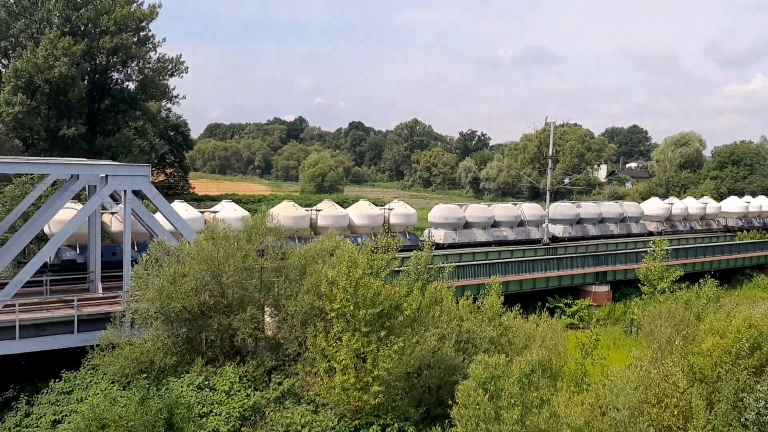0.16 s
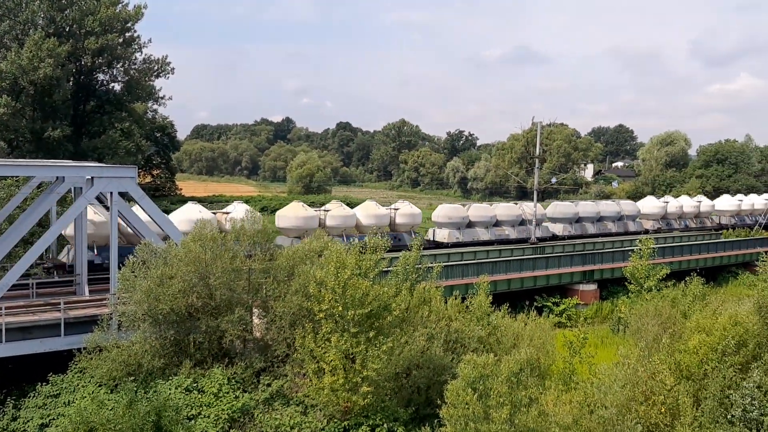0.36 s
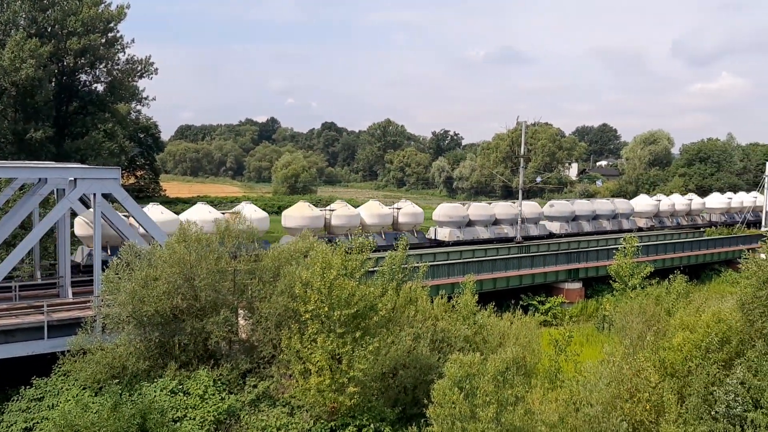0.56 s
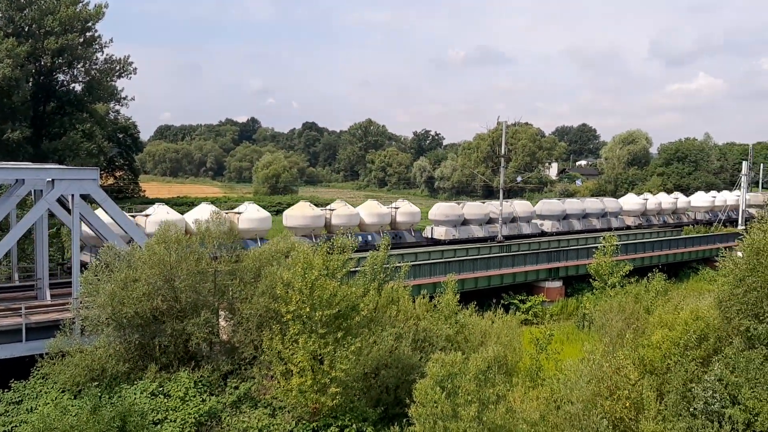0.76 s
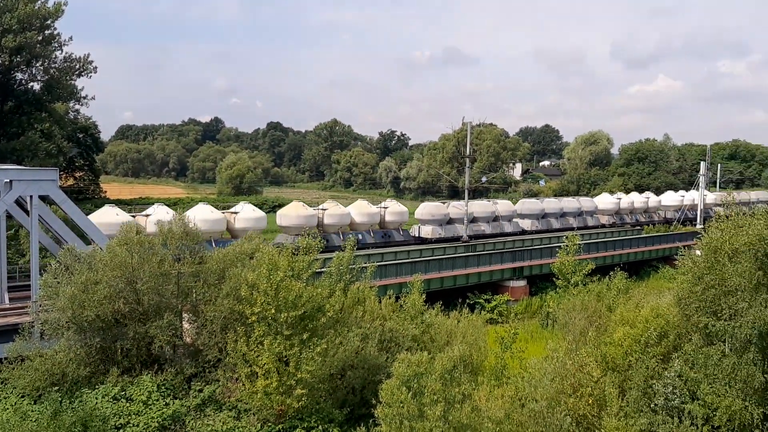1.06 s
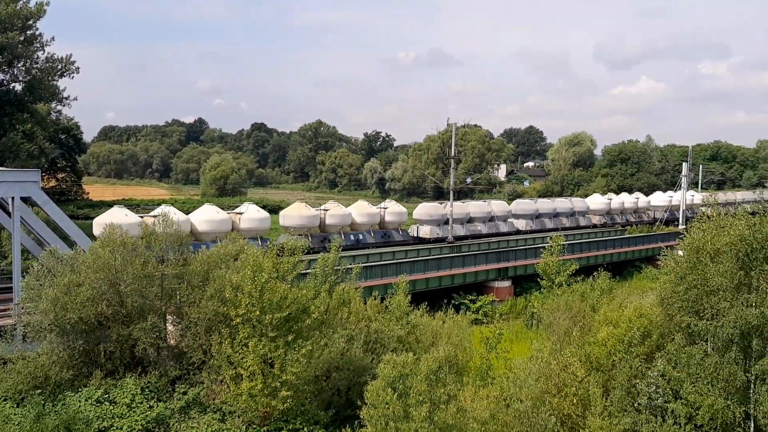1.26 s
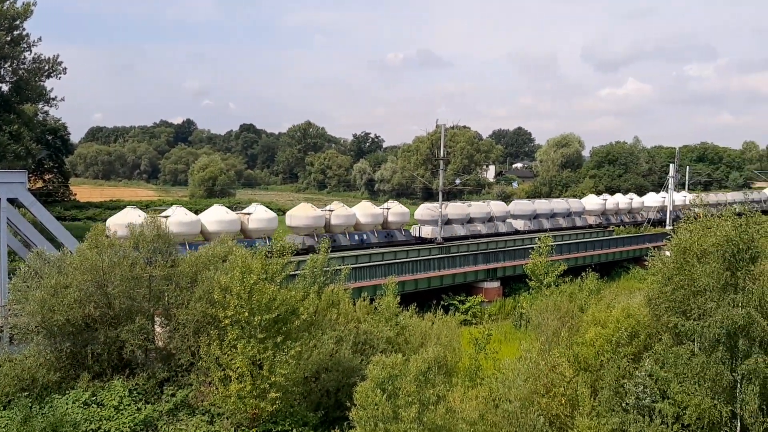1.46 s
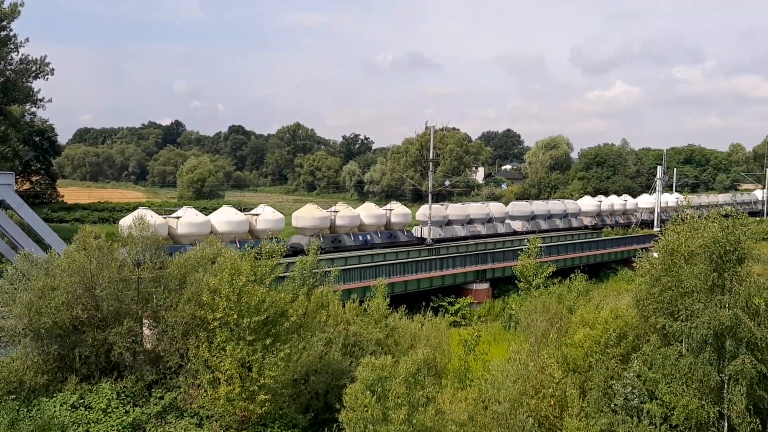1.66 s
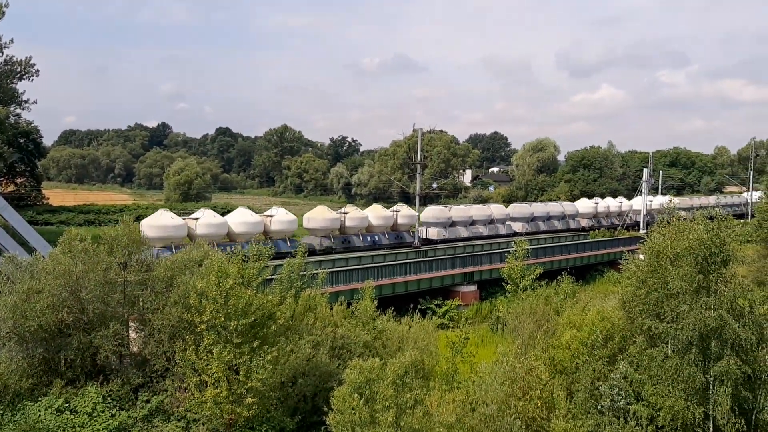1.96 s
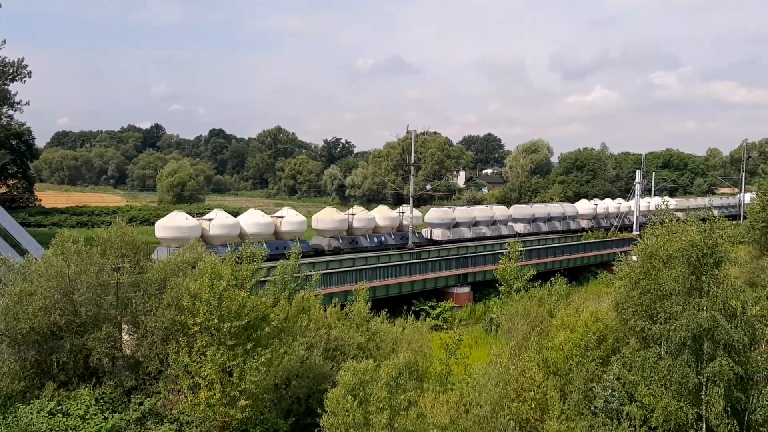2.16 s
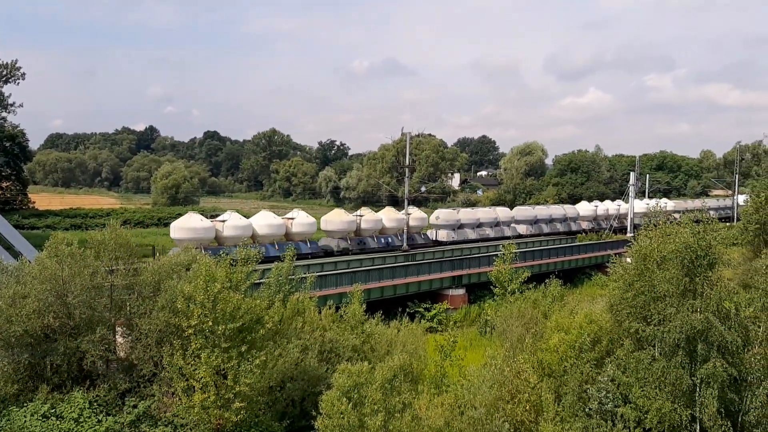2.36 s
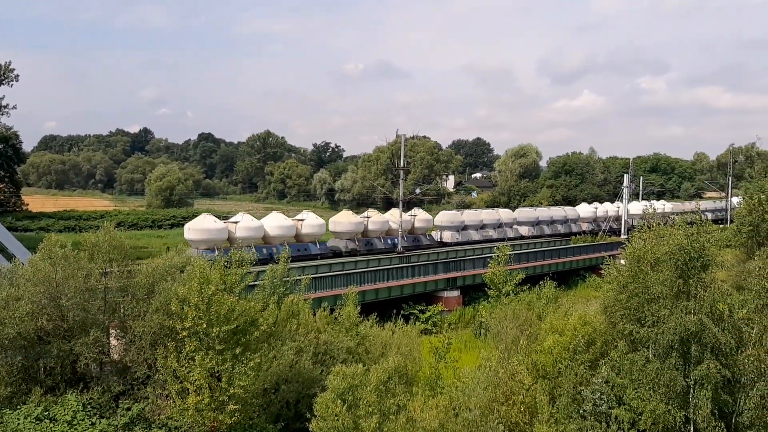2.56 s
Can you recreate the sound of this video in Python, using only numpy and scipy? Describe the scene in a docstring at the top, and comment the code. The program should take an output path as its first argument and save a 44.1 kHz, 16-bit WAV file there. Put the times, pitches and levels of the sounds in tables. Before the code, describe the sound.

Freight train wheels screech high and shrill, with rumbling, thumping steel bridge sounds dying away beneath.

```python
"""A freight train leaves a steel bridge, outdoors, off to the right of two microphone ports.
At first axles thump, the span booms and one wheel squeals, over rumble, clatter, rolling noise and flange hiss.
From about 0.9 s a second, slightly higher wheel joins, then a faint third, as rumble and clatter fade.
Each squeal is a fluttering tone, the two strong ones in a halo of scattered sound; brief squeaks come and go.
The rumbles and hisses are coloured noise, the thumps short bursts of scattered tone."""
import sys
import numpy as np
from scipy import signal
from scipy.fft import rfft, irfft, next_fast_len
from scipy.io import wavfile
from scipy.ndimage import uniform_filter1d, minimum_filter1d, map_coordinates

SR = 44100
rng = np.random.default_rng(int(sys.argv[2]) if len(sys.argv) > 2 else 0)


def put_to_file(sound):
    """Save the sound as 16-bit audio at rate SR, in the file named by the first command-line argument."""
    columns = np.atleast_2d(sound).T  # one column per channel
    safe = np.clip(columns, -1, 1)
    whole_steps = np.round(safe * 32767)
    wavfile.write(sys.argv[1], SR, whole_steps.astype(np.int16))


N = 119070
TIME_S = np.arange(N) / SR
LAG_MS = 0.451  # how much later the left port hears the train

# Squeal strength of the low and the high wheel, before trim: t/s, level/dB
LOW_WHEEL_STRENGTH = [(0, -25), (.08, -22), (.14, -15), (.28, -15.5), (.34, -21), (.48, -17), (.52, -22),
                      (.58, -19), (.66, -23), (.7, -16.5), (.8, -22), (1.05, -26), (1.35, -30), (1.72, -27),
                      (1.87, -19), (2.0, -26), (2.36, -23), (2.44, -17), (2.5, -20), (2.57, -17),
                      (2.7, -24)]
HIGH_WHEEL_STRENGTH = [(0, -38), (.88, -37), (.98, -21), (1.06, -21), (1.1, -13), (1.145, -14.5),
                       (1.18, -26), (1.215, -15), (1.3, -18), (1.35, -16), (1.42, -23), (1.62, -19),
                       (1.78, -20), (1.84, -13.5), (1.92, -19), (2.02, -21), (2.06, -14), (2.09, -18),
                       (2.12, -13), (2.16, -23), (2.26, -13.5), (2.32, -14), (2.36, -18), (2.445, -13),
                       (2.49, -24), (2.7, -22)]


def amp(db):
    """Decibels to gain."""
    return 10 ** (np.asarray(db) / 20)


def unit(x):
    """Scale to rms 1."""
    return x / np.sqrt(np.mean(x ** 2) + 1e-20)


def along(points, hz):
    """Read (f/Hz, value) points on a log frequency axis."""
    f, v = np.transpose(points)
    return np.interp(np.log(hz + 1), np.log(f + 1), v)


def curve(rows):
    """Read (t/s, value) points, one value per sample."""
    return np.interp(TIME_S, *np.transpose(rows))


def wobble(rate):
    """A smooth random curve through rate knots a second."""
    knots = rng.standard_normal(4096)
    return map_coordinates(knots, [np.arange(N) * rate / SR], mode="wrap")


def filtered(x, response):
    """Multiply the spectrum of x by a response of frequency."""
    m = next_fast_len(N + 8192)  # padded so the end does not wrap onto the start
    spectrum = rfft(x, m) * response(np.fft.rfftfreq(m, 1 / SR))
    return irfft(spectrum, m)[..., :N]


def pan(side_db):
    """Left and right gains of constant power; negative dB leans to the right."""
    gains = amp(np.array([[.5], [-.5]]) * side_db)
    return gains / np.sqrt(np.mean(gains ** 2, axis=0))


def resonance(centre_hz, half_width_hz):
    """Colour in dB of a resonance, 6 dB down at half_width_hz from its centre."""
    return lambda hz: -20 * np.log10(1 + ((hz - centre_hz) / half_width_hz) ** 2)


def rush(colour_db):
    """Noise of rms 1 from the right: the two ports share part of it and the left hears it later."""
    # Likeness of the two ports: f/Hz, likeness (0 to 1)
    likeness = [(100, .98), (480, .95), (620, .5), (1300, .5), (1800, .3), (2500, .55), (4000, .5),
                (7000, .25), (14000, .15)]
    # Balance of the two ports: f/Hz, left-right level/dB
    balance = [(60, -2.4), (300, -2.5), (700, -2.5), (1400, -2), (2600, -6), (4000, -3.5), (5500, -12.5),
               (7000, -6.5), (10000, -7), (14000, -1.5)]
    lag_above_hz = 560

    hz = np.fft.rfftfreq(N, 1 / SR)
    turn = np.arccos(np.clip(along(likeness, hz), 0, 1)) / 2
    mid, side = rfft(rng.standard_normal((2, N))) * [np.cos(turn), np.sin(turn)]
    lag = np.exp(-2j * np.pi * hz * LAG_MS / 10 ** 3 * (hz > lag_above_hz))
    ports = np.array([(mid + side) * lag, mid - side])
    return unit(irfft(ports * pan(along(balance, hz)) * amp(colour_db(hz)), N))


def coloured_rush(colour):
    """A rush whose colour is read from (f/Hz, level/dB) points."""
    return rush(lambda hz: along(colour, hz))


def patchy(x, depth_db):
    """Narrow bands of a noise swell and fade on their own, by depth_db rms."""
    cells = signal.stft(x, nperseg=2048)[2]
    field = rng.standard_normal(cells.shape[1:])
    field = uniform_filter1d(field, size=3, axis=0)  # across frequency
    field = uniform_filter1d(field, size=6, axis=1)  # across time
    return unit(signal.istft(cells * amp(depth_db * unit(field)), nperseg=2048)[1][:, :N])


def scatter(width_hz):
    """Random complex gain of a tone that arrives by many changing paths."""
    slope = 2.6  # well beyond width_hz the amplitude falls as this power of frequency
    hz = np.fft.fftfreq(N, 1 / SR)
    a, b = rng.standard_normal((2, N))
    gain = np.fft.ifft((a + 1j * b) * (1 + (hz / width_hz) ** 2) ** (-slope / 2))
    return gain / np.std(gain)


def tone(hz, lag_ms=LAG_MS):
    """Complex tone at both ports, its real part of rms 1; the left one hears it later."""
    cycles = np.cumsum(hz) / SR
    late_cycles = np.array([[1], [0]]) * hz * lag_ms / 10 ** 3
    return np.sqrt(2) * np.exp(2j * np.pi * (cycles - late_cycles))


def flanges():
    """Flanges scrape along the rail head: a patchy hiss with a faint fizz above it."""
    # Hiss and top-octave fizz over time, before trim: t/s, level/dB
    hiss_level = [(0.0, -41), (0.12, -41), (0.66, -38), (0.79, -44.5), (1.14, -35), (1.25, -37.5),
                  (1.91, -38.5), (1.98, -35.5), (2.2, -38.5), (2.27, -36), (2.68, -38.5), (2.7, -41)]
    fizz_level = [(0.0, -56.5), (0.13, -58), (0.39, -54.5), (0.79, -58), (1.48, -53.5), (2.69, -53),
                  (2.7, -49)]
    # Their relative colours: f/Hz, level/dB
    hiss_colour = [(3000, -18.5), (5000, 6), (5600, 3), (6100, 2.5), (6600, -2), (7100, 0.5), (7900, -8.5),
                   (8500, -28.5), (10000, -50)]
    fizz_colour = [(7500, -34), (8700, -16.5), (9350, 1.5), (10200, -7), (11000, -2.5), (11700, 2),
                   (12400, -2), (13300, -8), (14100, -5), (15000, -24), (15700, -15)]
    hiss_trim_db, fizz_trim_db, patchy_db = 5, 2.5, 3.5

    hiss = patchy(coloured_rush(hiss_colour), patchy_db)
    fizz = patchy(coloured_rush(fizz_colour), patchy_db)
    hiss_gain = amp(curve(hiss_level) + hiss_trim_db + 0.35 * wobble(13))
    fizz_gain = amp(curve(fizz_level) + fizz_trim_db + .4 * wobble(16))
    return hiss * hiss_gain + fizz * fizz_gain


def rolling():
    """Rough treads on the rails make a broad noise and ring a few resonances."""
    # Rolling noise over time, before trim: t/s, level/dB
    rolling_level = [(0.0, -40.5), (0.07, -42.5), (0.51, -42), (1.25, -43), (1.76, -41), (1.95, -42),
                     (2.7, -41.5)]
    # Its relative colour: f/Hz, level/dB
    rolling_colour = [(200, -21), (600, -7.5), (900, -2), (1300, -0.5), (1800, -7.5), (2300, -2.5),
                      (2750, -1.5), (3000, -2), (3250, 2.5), (3500, -1.5), (3800, 0.5), (4200, 5),
                      (4700, -3.5), (5500, -32)]
    # Wheel and rail resonances, each loudest as its wagon passes:
    # f/Hz, half-width/Hz, level/dB, loudest at t/s, fall either side/(dB per s)
    resonances = [(1522, 64, -39, 0.96, 5), (2008, 120, -42.5, 1.73, 0.5), (2567, 108, -37.5, 1.98, 3.5)]
    trim_db, patchy_db = 9.5, 2.6

    noise = patchy(coloured_rush(rolling_colour), patchy_db)
    out = noise * amp(curve(rolling_level) + trim_db + 0.55 * wobble(12))
    for centre_hz, half_width_hz, db, loudest_s, fall in resonances:
        ring = rush(resonance(centre_hz, half_width_hz))
        out = out + ring * amp(db - fall * np.abs(TIME_S - loudest_s) + wobble(6.92))
    return out


def bridge():
    """The girders rumble, the deck plates clatter and the span booms at its low resonance."""
    # Girder rumble, deck clatter and span boom over time, before trim: t/s, level/dB
    rumble_level = [(0, -27), (.3, -28), (.7, -29.5), (1.0, -28.5), (1.15, -31.5), (1.45, -34), (1.56, -32),
                    (1.7, -35), (1.9, -34), (2.1, -36.5), (2.5, -37.5), (2.7, -36)]
    deck_level = [(0, -32.5), (.3, -32.5), (.5, -36), (.75, -34), (.92, -30.5), (1.05, -37), (1.2, -40),
                  (1.4, -35.5), (1.7, -43.5), (2.1, -48.5), (2.3, -46.5), (2.7, -70)]
    boom_level = [(0, -49), (.17, -34), (.35, -35), (.7, -35), (.9, -43), (1.05, -50), (1.35, -52),
                  (1.68, -41), (2.0, -51), (2.15, -39), (2.35, -41), (2.7, -46)]
    # Relative colours of rumble and clatter: f/Hz, level/dB
    rumble_colour = [(25, -46), (45, -26), (60, -5.5), (90, -4), (115, 0.5), (145, -0.5), (190, -4.5),
                     (222, -2.5), (300, -5.5), (390, -4.5), (470, -4.5), (600, -15), (900, -17.5),
                     (1400, -23.5), (3000, -81)]
    deck_colour = [(300, -15), (600, -4.5), (850, 2), (1050, -0.5), (1400, -10), (2500, -33), (5000, -56)]
    rumble_trim_db, deck_trim_db, boom_trim_db = -0.5, -1, -1
    boom_hz, boom_half_width_hz = 64.5, 8

    rumble = coloured_rush(rumble_colour)
    rumble = rumble * amp(curve(rumble_level) + rumble_trim_db + 0.64 * wobble(22))
    deck = coloured_rush(deck_colour) * amp(curve(deck_level) + deck_trim_db + wobble(20))
    boom = rush(resonance(boom_hz, boom_half_width_hz)) * amp(curve(boom_level) + boom_trim_db)
    return rumble + deck + boom


def thumps():
    """Each axle blow on the deck briefly rouses a cluster of girder modes."""
    # Axle blows, level before trim: t/s, level/dB, girder f/Hz
    blows = [(.275, -24, 450), (.362, -22, 110), (.403, -23, 410), (.448, -24, 380), (.622, -27, 400),
             (.758, -24, 400), (.862, -28, 280)]
    rise_s, width_hz, trim_db = .01, 80, -6.5

    out = np.zeros(N)
    for start_s, db, hz in blows:
        u = np.maximum(TIME_S - start_s, 0) / rise_s
        swell = u * np.exp(1 - u)  # peaks at 1 after rise_s
        ring = (np.exp(2j * np.pi * hz * TIME_S) * scatter(width_hz)).real
        out += amp(db + trim_db) * swell * unit(ring)
    return out * pan(side_db=-1)


def squeaks():
    """Other wheel modes swell for a moment and die, some nearly pure, some smeared."""
    # Brief squeaks, level before trim: start t/s, end t/s, f/Hz, smear/Hz, level/dB, left-right level/dB
    brief_squeaks = [(-.12, .16, 4098, 5, -34, -3), (.12, .4, 4092, 5, -38, -3),
                     (.38, .66, 4088, 8, -35, -3), (2.41, 2.64, 4066, 10, -34, -3),
                     (.47, .65, 3104, 28, -38, -3), (1.67, 1.81, 3343, 15, -37, -3),
                     (.26, .41, 6130, 90, -39, -6), (.09, .25, 5445, 12, -41, -8),
                     (.25, .65, 5175, 18, -43, -10), (1.03, 1.21, 6338, 20, -42, -6),
                     (1.16, 1.32, 5290, 25, -38, -8), (1.75, 2.55, 5818, 20, -43, -6),
                     (1.94, 2.1, 6090, 70, -40, -6), (2.23, 2.4, 6056, 70, -38, -6)]
    trim_db, smeared_share = -2.5, .4
    lag_ms = 0.31  # they come from nearer the middle of the bridge

    out = np.zeros((2, N))
    for start, end, hz, smear_hz, db, side_db in brief_squeaks:
        progress = np.clip((TIME_S - start) / (end - start), 0, 1)
        swell = np.abs(np.sin(np.pi * progress)) ** .5
        voice = tone(hz + smear_hz * wobble(90), lag_ms)
        voice = voice * (1 + smeared_share * scatter(smear_hz + 30))
        out += amp(db + trim_db) * swell * unit(voice.real) * pan(side_db)
    return out


def halos():
    """Moving wagons and girders smear the squeal in pitch; each halo partly follows its wheel's swells."""
    # Scattered squeal around the low and the high wheel, before trim: t/s, level/dB
    low_halo = [(0, -15.5), (.2, -17.5), (.5, -14.5), (.8, -19), (1.05, -16.5), (1.3, -23), (1.6, -17.5),
                (2.2, -19), (2.55, -20), (2.7, -15)]
    high_halo = [(0, -50), (.45, -45), (.82, -34), (1.1, -14.5), (1.3, -13.5), (1.6, -15), (1.9, -14),
                 (2.3, -13.5), (2.7, -18.5)]
    # The halos in that order: centre f/Hz, width/Hz, left-right level/dB
    placing = [(4690, 170, -19.5), (4815, 135, -12)]
    trim_db, alike = -5.2, 0.2  # alike: likeness of the two ports
    follow_share, memory_s = 0.34, 0.1  # share of the wheel's quick swells; what counts as quick

    out = np.zeros((2, N))
    wheels = (LOW_WHEEL_STRENGTH, HIGH_WHEEL_STRENGTH)
    for strength, wheel, (hz, width_hz, side_db) in zip((low_halo, high_halo), wheels, placing):
        wheel_db = curve(wheel)
        swell_db = wheel_db - uniform_filter1d(wheel_db, size=int(memory_s * SR))
        right = scatter(width_hz)
        left = alike * right + np.sqrt(1 - alike ** 2) * scatter(width_hz)
        smeared = (tone(np.full(N, hz)) * np.array([left, right])).real
        out += smeared * amp(curve(strength) + trim_db + follow_share * swell_db) * pan(side_db)
    return out


def squeal():
    """Each slipping wheel sings one mode, slightly unsteady in pitch and strength."""
    # Squeal strength of the faint wheel, before trim: t/s, level/dB
    faint_wheel = [(0, -38), (1.3, -37), (1.42, -27), (1.6, -24), (1.7, -34), (2.0, -28), (2.25, -33),
                   (2.7, -26)]
    # Low, high and faint wheel: f/Hz at 0 s, drift/(Hz per s), left-right level/dB
    voices = [(4686, -7, -21), (4846, -20, -16), (4570, -18, -13)]
    jitter_hz, jitter_rate = 5, 60  # rates in knots a second
    flutter_db, flutter_rate, trim_db = 1.2, 35, -2.7

    out = np.zeros((2, N))
    strengths = (LOW_WHEEL_STRENGTH, HIGH_WHEEL_STRENGTH, faint_wheel)
    for strength, (hz, drift, side_db) in zip(strengths, voices):
        voice = tone(hz + drift * TIME_S + jitter_hz * wobble(jitter_rate)).real
        level_db = curve(strength) + trim_db + flutter_db * wobble(flutter_rate)
        out += voice * amp(level_db) * pan(side_db)
    return out


def scene():
    """The whole train."""
    return squeal() + halos() + squeaks() + bridge() + thumps() + rolling() + flanges()


def record(dry):
    """The recorder limits the highest peaks, cuts the deepest bass and stops at its band limit."""
    ceiling, low_cut_hz, top_hz = .97, 55, 15700
    need = np.minimum(1, ceiling / (np.abs(dry).max(axis=0) + 1e-9))
    gain = uniform_filter1d(minimum_filter1d(need, size=200), size=200)  # sizes in samples

    def band(hz):
        """Steep bass cut and a sharp upper edge."""
        return (hz < top_hz) * hz ** 4 / np.hypot(hz ** 4, low_cut_hz ** 4)

    return filtered(dry * gain, band)


dry = scene()
out = record(dry)
put_to_file(out)
```